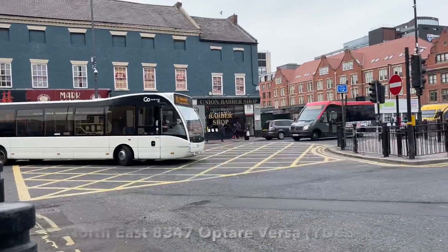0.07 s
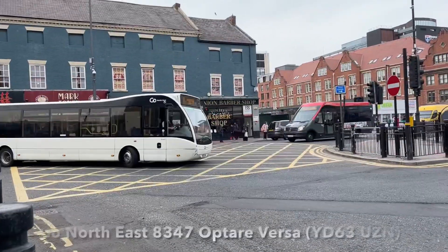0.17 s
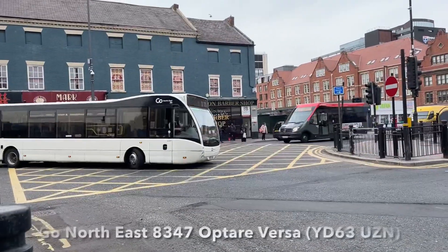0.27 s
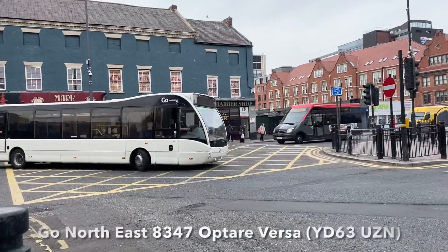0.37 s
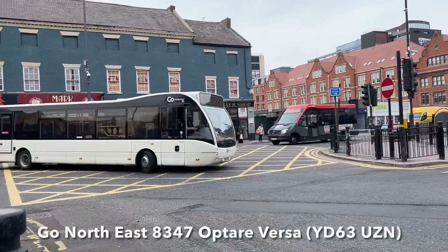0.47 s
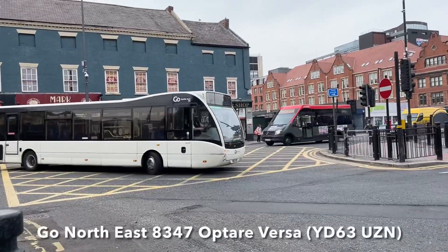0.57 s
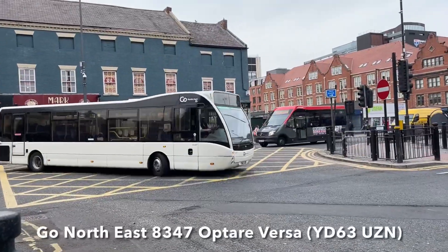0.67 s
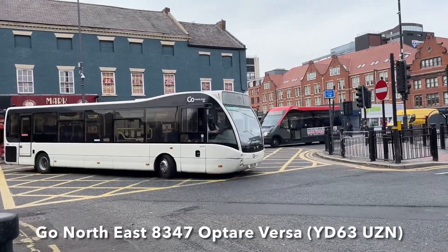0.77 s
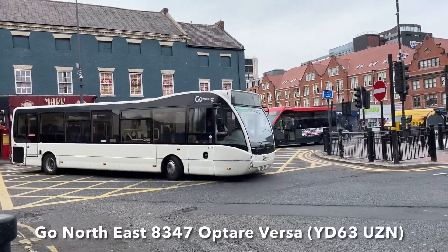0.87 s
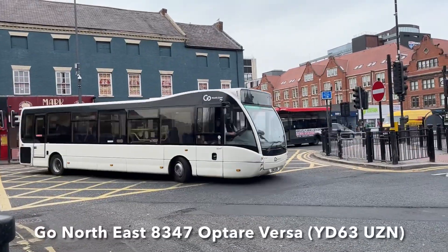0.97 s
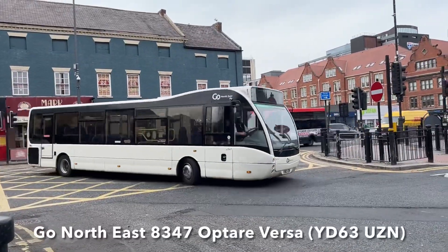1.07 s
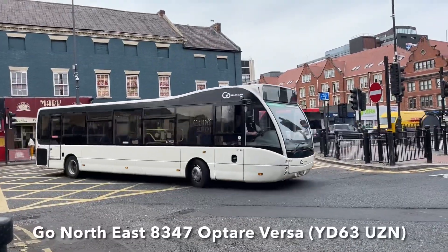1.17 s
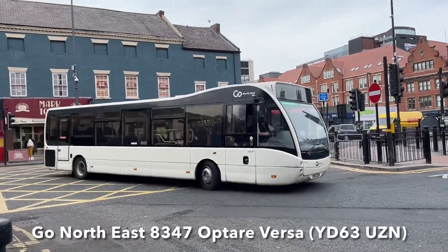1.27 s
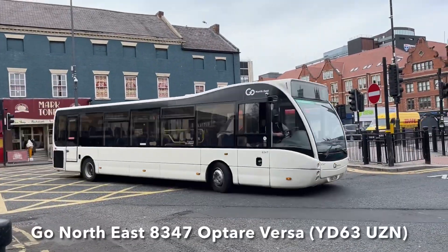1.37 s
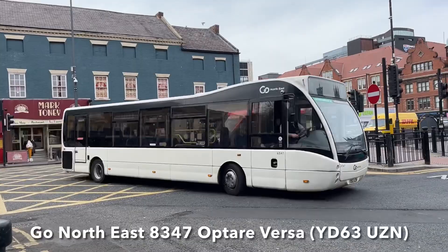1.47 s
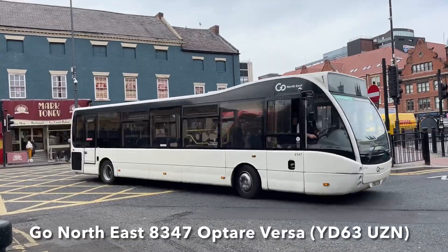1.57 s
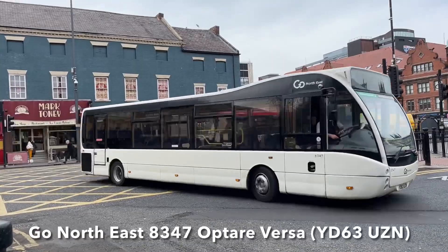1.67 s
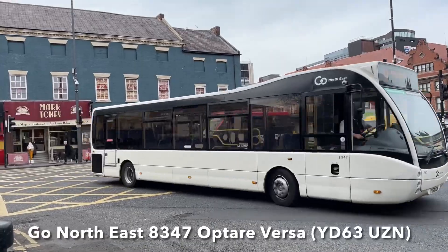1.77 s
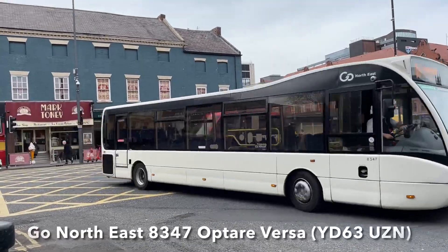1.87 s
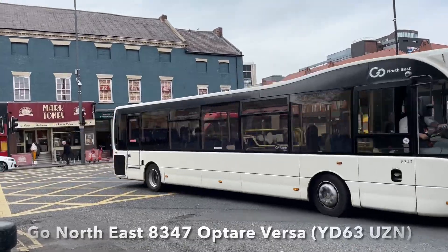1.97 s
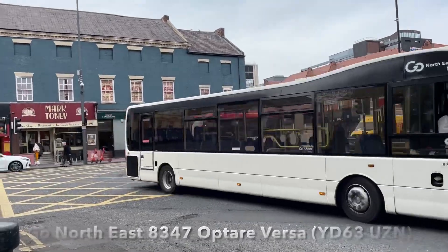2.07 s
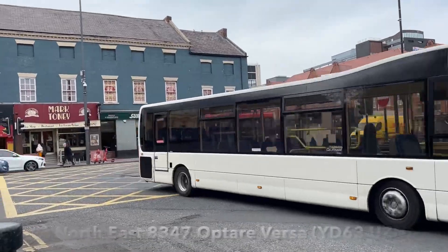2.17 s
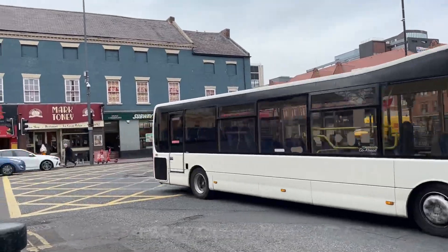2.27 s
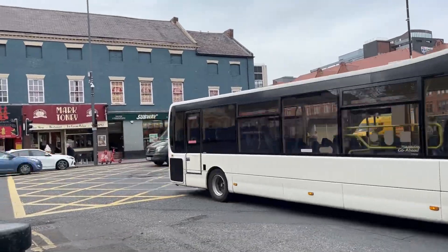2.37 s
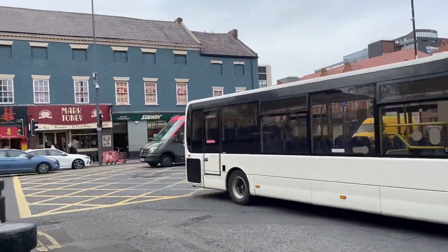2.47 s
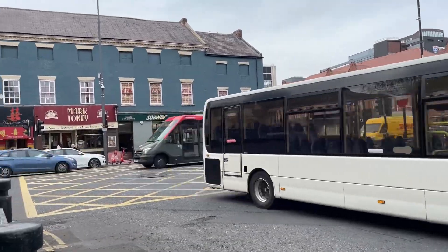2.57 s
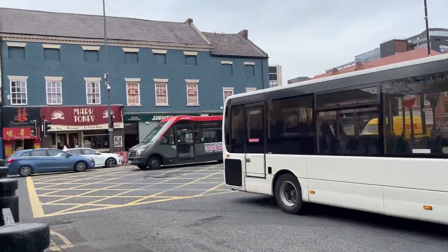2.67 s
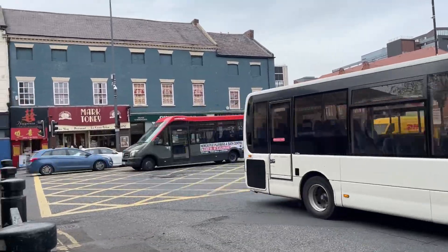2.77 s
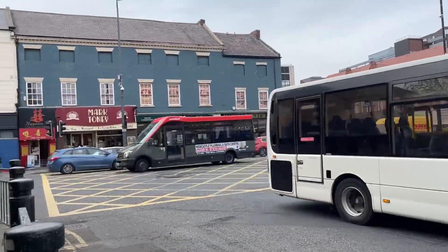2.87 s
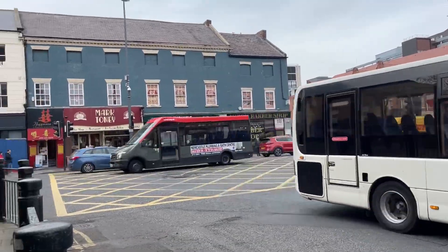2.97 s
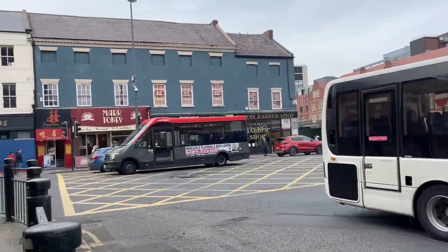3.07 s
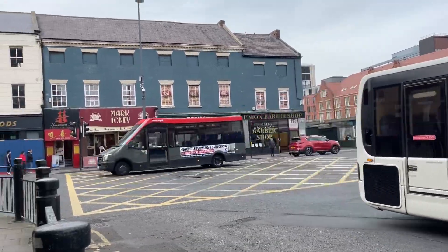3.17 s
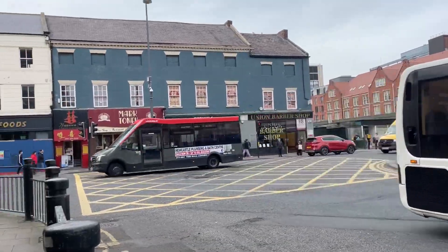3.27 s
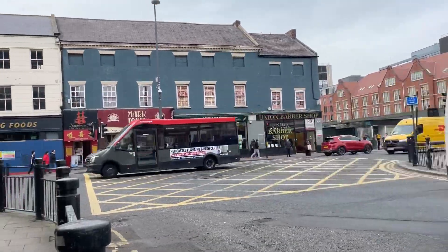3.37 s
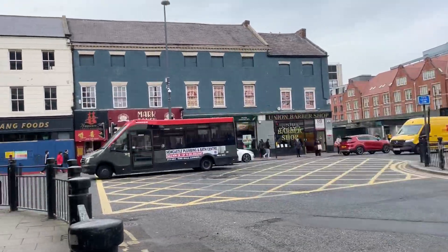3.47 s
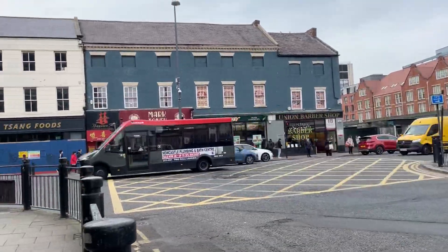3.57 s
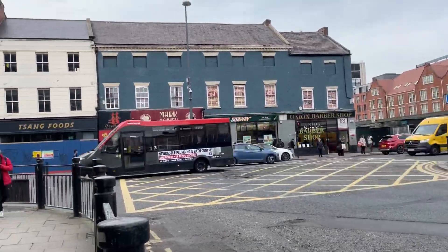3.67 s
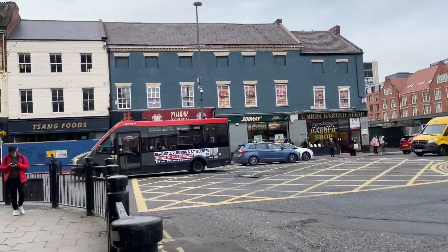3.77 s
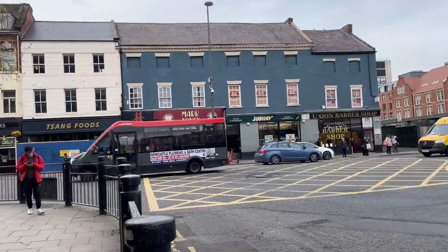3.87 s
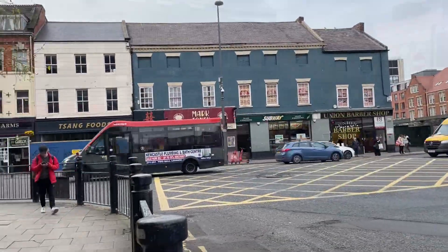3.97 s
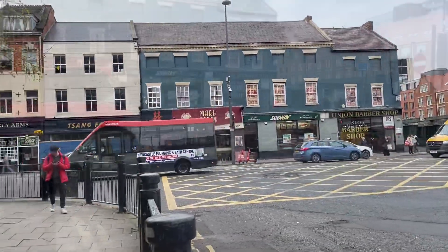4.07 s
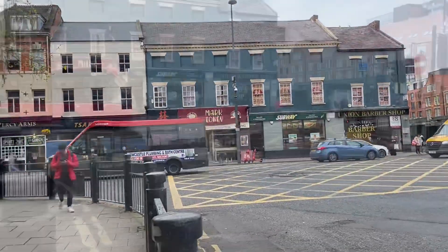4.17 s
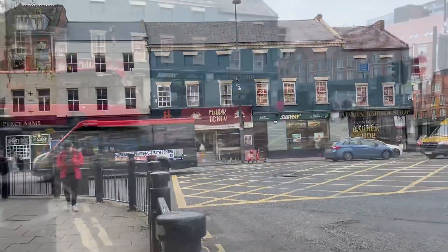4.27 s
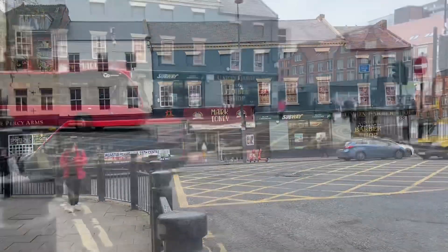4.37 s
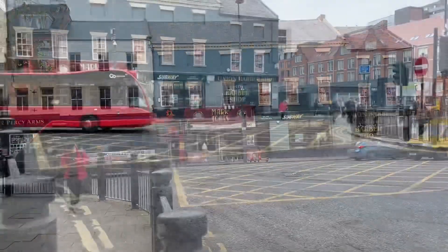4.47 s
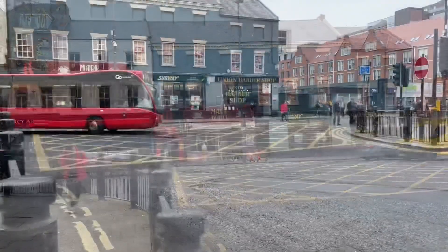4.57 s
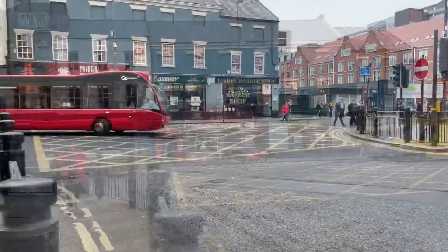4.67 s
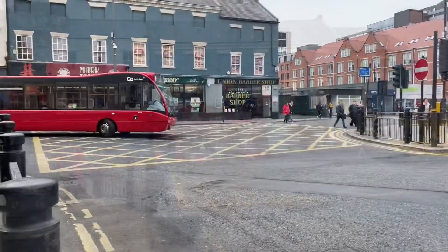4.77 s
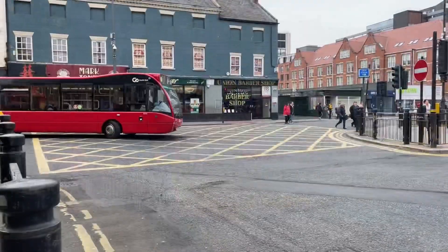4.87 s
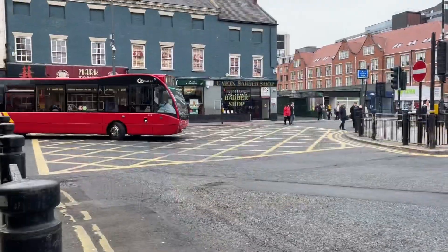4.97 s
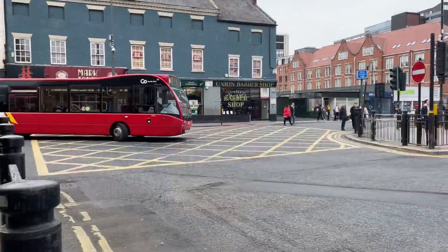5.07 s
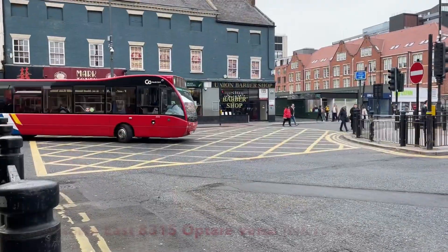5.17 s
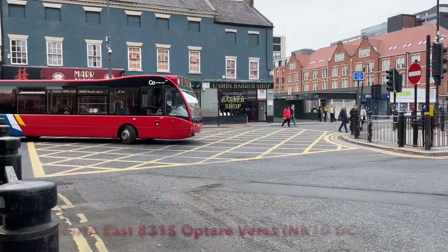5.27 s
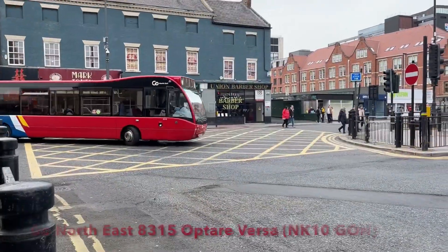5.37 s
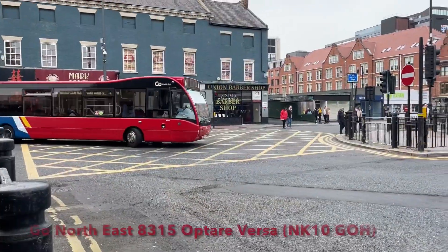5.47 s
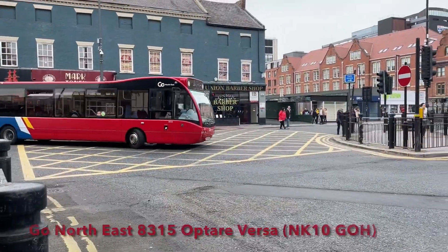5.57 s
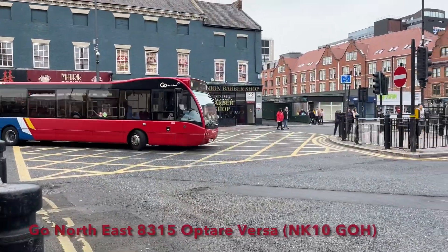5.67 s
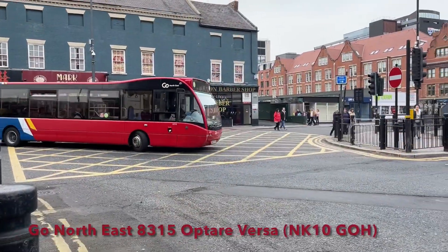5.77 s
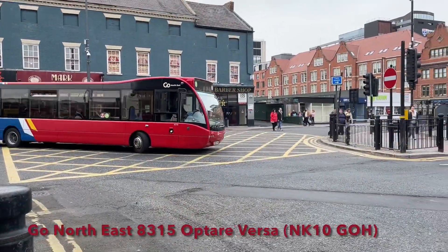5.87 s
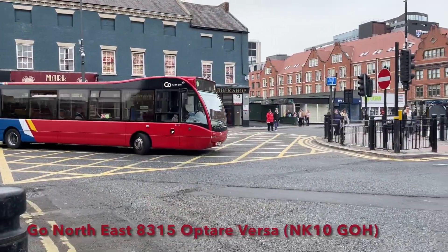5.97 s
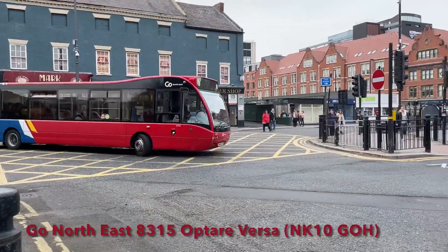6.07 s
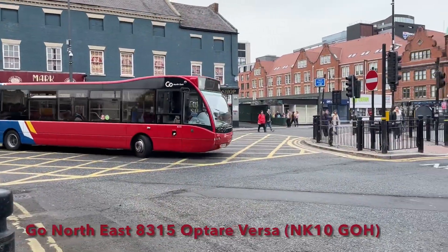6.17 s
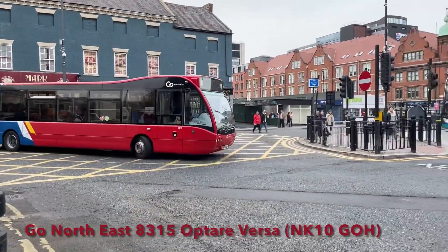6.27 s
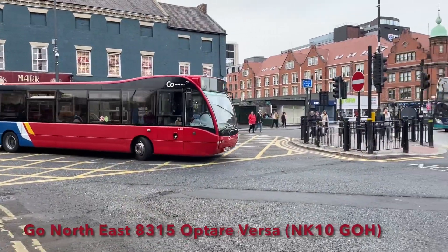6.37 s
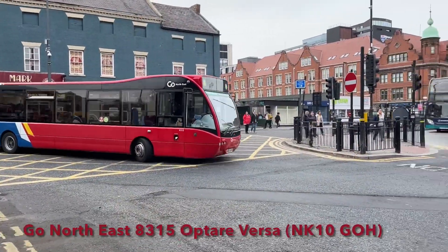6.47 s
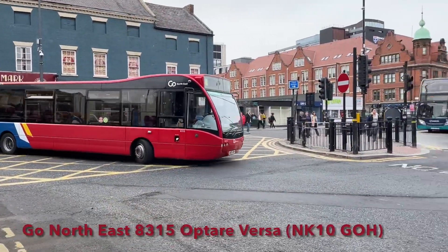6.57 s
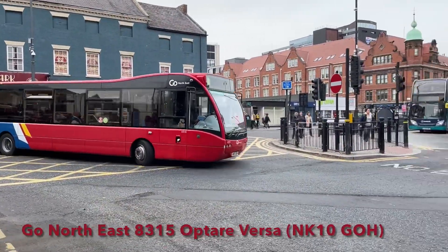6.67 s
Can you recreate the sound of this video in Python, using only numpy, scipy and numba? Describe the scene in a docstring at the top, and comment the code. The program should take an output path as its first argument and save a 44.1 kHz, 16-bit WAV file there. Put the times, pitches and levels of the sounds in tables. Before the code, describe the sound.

Sharp metallic knocks from a loose street cover open over the low rumble of a diesel bus in city traffic. The bus vents a hiss of air, knocks again and passes to the right, the traffic roar swelling and easing. A second bus then pulls in from the left with light puffs, another clank and a rising hum. It is heard in stereo through a phone several metres off, with short echoes from the buildings.

```python
"""Two diesel buses at a city junction

One bus drones past to the right, clattering, and vents its air valve; a second pulls in from the left.
Engines are wavering firing tones over a noise bed of traffic; escaping air is resonant, sinking noise.
Wheels knock a loose iron cover into ringing, and house fronts echo the knocks, air and engines.
All is heard from some metres away through the two microphone ports of a phone."""
import sys
import numpy as np
from scipy import signal
from scipy.fft import rfft, irfft, next_fast_len
from scipy.io import wavfile
from scipy.ndimage import uniform_filter1d, map_coordinates
from numba import njit

SR = 44100
rng = np.random.default_rng(int(sys.argv[2]) if len(sys.argv) > 2 else 0)


def output_pcm(signal):
    """Save a mono or channel-first signal as 16-bit PCM at the path in sys.argv[1].

    Samples are clipped to [-1, 1] before scaling.
    """
    pcm = np.clip(np.atleast_2d(signal).T, -1, 1) * 32767
    wavfile.write(sys.argv[1], SR, np.round(pcm).astype(np.int16))


N = 295470

# ride of the traffic bed, scaled per layer: (time [s], loudness re closest pass [dB], treble lift [dB])
TRAFFIC_RIDE = [(0, -5.5, -3), (.3, -5.5, 0), (.63, -5, 0), (1.07, -6.5, 1.5), (1.4, -4, -1), (2, -4, -1.5),
                (2.3, -4.5, 0), (2.65, -1.5, -2), (2.85, -2, 1.5), (3.3, -1, 0.5), (3.8, -1.5, 1.5),
                (4.05, -3.5, -3), (4.35, -6.5, -3), (4.6, -9.5, -4), (4.85, -9, -6.5), (5.3, -7, -7.5),
                (5.55, -6, -8.5), (5.9, -8.5, -2), (6.2, -7.5, -2), (6.4, -7.5, -4), (6.7, -6, -2)]
# where the nearest vehicle sits:
# (time [s], left port's lag for lows [ms], left port's lag for highs [ms], direct share [0-1])
VEHICLE_BEARING = [(0, -0.16, -0.024, 0.34), (2.2, -0.055, -0.048, 0.26), (2.9, 0.13, -0.00077, 0.25),
                   (3.2, 0.27, 0.37, 0.08), (3.6, 0.43, 0.53, 0.64), (4.7, 0.44, 0.37, 0.16),
                   (4.85, -0.54, -0.27, 0.03), (5.55, -0.42, -0.31, 0.16), (5.7, -0.24, -0.045, 0.31),
                   (6.7, -0.18, 0.035, 0.32)]


def undb(db):
    return 10 ** (np.asarray(db) / 20)


def unit(x):
    return x / np.sqrt(np.mean(x ** 2))


def curves(table, silent=()):
    """A table's columns as automation; the dB columns in silent fade out beyond its ends."""
    times, *columns = np.transpose(table)
    t = np.arange(N) / SR
    outside_db = -400 * (np.maximum(times[0] - t, 0) + np.maximum(t - times[-1], 0))
    return [np.interp(t, times, c) + (k in silent) * outside_db for k, c in enumerate(columns)]


def eq_gain(hz, table):
    """Gain of an EQ curve drawn over log frequency."""
    points_hz, db = np.transpose(table)
    return undb(np.interp(np.log(hz), np.log(points_hz), db))


def glide(start, end, from_hz, to_hz):
    """A pitch moving evenly between two moments."""
    return np.interp(np.arange(N) / SR, (start, end), (from_hz, to_hz))


def gate(start, end, fade_s):
    """An envelope with straight fades in and out."""
    t = np.arange(N) / SR
    return np.clip(np.minimum(t - start, end - t) / fade_s, 0, 1)


@njit
def svf(x, hz, width):
    """State-variable band-pass with a moving centre, gain 1 there."""
    y, band_state, low_state = np.empty(len(x)), 0., 0.
    for i in range(len(x)):
        g, damping = np.pi * hz[i] / SR, width / hz[i]
        g *= 1 + g * g / 3
        v = (band_state + g * (x[i] - low_state)) / (1 + g * (g + damping))
        band_state = 2 * v - band_state
        low_state += 2 * g * v
        y[i] = damping * v
    return y


def resonate(x, hz, width_hz):
    """A signal through one resonance twice, rms 1."""
    hz, width_hz = hz + np.zeros(N), float(width_hz)
    return unit(svf(svf(x, hz, width_hz), hz, width_hz))


def band(hz, width_hz):
    return resonate(rng.standard_normal(N), hz, width_hz)


def walk(rate):
    """Smooth random drift, rate steps a second, spread near 1."""
    hold = int(SR / rate)
    steps = np.repeat(rng.standard_normal(N // hold + 1), hold)
    return 1.3 * uniform_filter1d(uniform_filter1d(steps, hold), hold)[:N]


def tone(hz, db, rough, rate=25):
    """A sine wavering in level and phase."""
    size = np.sqrt(2) * undb(db) * (1 + rough * walk(rate))
    return size * np.sin(2 * np.pi * np.cumsum(hz) / SR + rough * walk(rate))


def ports(x, lag_ms, shadow_db_per_ms=2.5):
    """Pans a source: later and weaker at the further port; a positive lag puts it right."""
    shift, shadow_db = lag_ms * SR / 2000, shadow_db_per_ms * lag_ms / 2
    return np.array([map_coordinates(x, [np.arange(N) - side * shift], order=3, mode="nearest")
                     * undb(-side * shadow_db) for side in (1, -1)])


def street_echo(x, t60_s=0.29, predelay_s=0.015, damp_hz=3700):
    """House fronts return a short, dull cloud of echoes, a different one to each port."""
    t = np.arange(SR) / SR
    cloud = rng.standard_normal((2, SR)) * undb(-60 * t / t60_s) * (t > predelay_s)
    cloud = signal.lfilter(*signal.butter(1, damp_hz, fs=SR), cloud)
    return signal.fftconvolve(x[None], cloud / np.sqrt(np.sum(cloud ** 2) / 2))[:, :N]


def traffic(firings):
    """Flickering noise bed: direct lows and highs from the nearest vehicle, and a wash from all around."""
    # rumble, body drone, tyre roar, fan and intake, hiss, top hiss:
    # (level at closest pass [dB], response to loudness [dB/dB], response to treble lift [dB/dB])
    layers = [(-22, 0.8, 0.07), (-24.5, 0.53, 0.52), (-27, 1.15, 0.18), (-34, 1.17, -0.12),
              (-45, 1.19, 0.26), (-52, 1.33, 1.5)]
    # borders of those layers: (frequency [Hz])
    edges_hz = (0, 120, 450, 1400, 3500, 8000, 20000)
    # traffic colour within each layer: (frequency [Hz], relative level [dB])
    spectrum = [(28, -67), (45, -37), (70, -31.5), (110, -35), (200, -30), (280, -35), (450, -39.5),
                (760, -38.5), (1100, -39), (2200, -46), (3300, -66), (5000, -65), (7500, -67.5),
                (10000, -60.5), (13000, -61), (16000, -72)]
    # stereo width of the wash: (frequency [Hz], side against mid [dB])
    wash_width = [(60, -18), (200, -11), (450, -0.5), (900, 1), (1800, 0.5), (2360, -2), (3100, -8.5),
                  (4100, -9), (5400, 0.5), (7200, 14), (10000, 1)]
    direct, wash = np.zeros((2, N)), np.zeros((2, N))
    direct_share = np.clip(curves(VEHICLE_BEARING)[-1], 0, 1)
    loud_db, treble_db = curves(TRAFFIC_RIDE)
    centres = 28 * 2 ** np.arange(0, 9.3, .4)
    throb = 1 + 0.088 * np.cos(2 * np.pi * firings)  # gas noise swells once a firing
    for (closest_db, by_loud, by_treble), low_hz, high_hz in zip(layers, edges_hz, edges_hz[1:]):
        level_db = closest_db + by_loud * loud_db + by_treble * treble_db + 0.52 * walk(3.805)
        inside = centres[(centres >= low_hz) & (centres < high_hz)]
        colour = eq_gain(inside, spectrum)
        for hz, weight in zip(inside, colour / np.linalg.norm(colour)):
            gain = weight * undb(level_db + 1.33 * walk(14))
            aimed = direct_share / (1 + (hz / 8000) ** 2)  # the treble arrives more scattered
            roar = band(hz, 0.41 * hz) * (throb if hz > 450 else 1)
            direct[int(hz > 1400)] += gain * np.sqrt(aimed) * roar
            spread = eq_gain(hz, wash_width)
            mid, side = band(hz, 0.53 * hz), spread * band(hz, 0.44 * hz)
            wash += gain * np.sqrt(1 - aimed) * np.array([mid + side, mid - side]) / np.hypot(1, spread)
    return *direct, wash


def idler():
    """The firing tone of an engine idling further off."""
    # idle: (time [s], firing rate [Hz], level [dB])
    idle = [(4.3, 55, -22), (4.65, 61.6, -32.5), (5.1, 59.3, -29.5), (5.4, 58.1, -44), (5.95, 60.9, -25),
            (6.3, 62.1, -42), (6.5, 64.7, -28), (6.7, 60.5, -48)]
    return tone(*curves(idle, silent=(1,)), rough=0.44, rate=15)


def distant_engines():
    """Further engines come and go as narrow, gliding hums."""
    # hums: (start [s], end [s], from [Hz], to [Hz], level [dB])
    hums = [(1.47, 2.1, 210, 189, -34), (2.5, 3, 187, 184, -35.5), (3.676, 4.35, 283, 273.7, -34),
            (4.916, 5.7, 100, 110.8, -32), (6.38, 8.4, 224, 340, -31.5), (5.6, 6.36, 160, 270, -40),
            (.75, 1.23, 280, 284, -38)]
    return sum(gate(start, end, fade_s=0.042) * tone(glide(start, end, from_hz, to_hz), db, rough=0.18)
               for start, end, from_hz, to_hz, db in hums)


def body_resonances(swell_db=9):
    """Wheel arches, grilles and exhaust swell and fade as bands of noise in the roar."""
    # swells: (start [s], crest [s], end [s], from [Hz], to [Hz], width [Hz], level [dB])
    swells = [(1.3, 3.5, 4.4, 794, 758, 256, -30), (3.25, 3.6, 3.9, 2490, 1960, 250, -35),
              (3.86, 4.1, 4.4, 2020, 2110, 160, -42.5), (6.2, 6.1, 8.7, 123, 150, 36, -32.5),
              (3.238, 3.53, 4.09, 2900, 3100, 810, -39.5), (3.4, 3.71, 4.0, 5450, 4800, 450, -51.5),
              (5.9, 6.5, 7.0, 1740, 1670, 110, -41.5), (5.9, 6.6, 7.0, 560, 730, 230, -37.5),
              (3.2, 3.55, 4.5, 4000, 3780, 1000, -48)]
    out = np.zeros(N)
    for start, crest, end, from_hz, to_hz, width_hz, db in swells:
        level_db, = curves([(start, db - swell_db), (crest, db), (end, db - swell_db)], silent=(0,))
        out += undb(level_db + 2.4 * walk(20)) * band(glide(start, end, from_hz, to_hz), width_hz)
    return out


def iron_cover(focus_db_per_octave=9, detune=0.015, crack_linger_s=0.0062):
    """Wheels strike and rattle a loose cover; its modes ring out over a hissy crack."""
    # modes of the cover: (pitch [Hz], level [dB], ring time to -60 dB [s])
    modes = [(320, -6, .025), (550, -6, .02), (790, -1, .035), (1080, -3, .03), (1250, -4, .022),
             (1465, -3, .028), (1645, -4, .022), (1755, -2, .032), (2050, -4, .016), (2285, -2, .026),
             (2570, -2, .024), (2900, -6, .016), (3400, -8, .012), (4120, -5, .018), (4570, -7, .014)]
    # wheel hits: (time [s], peak [dB], rattle time constant [s], best excited pitch [Hz], crack rms [dB])
    knocks = [(0.122, -9.5, 0.0023, 1710, -42), (0.127, -12, 0.009, 1730, -39),
              (0.1442, -18.5, 0.0079, 1740, -43), (.336, -24, .005, 2030, -54),
              (0.379, -37, .004, 2200, -57), (1.293, -39, .0067, 2502, -55), (2.845, -19, .003, 900, -60),
              (2.8755, -14, 0.0029, 635, -62), (2.891, -21, 0.0026, 990, -62), (2.915, -21, .004, 700, -64),
              (2.987, -19, .004, 700, -60), (3.0355, -13, .0015, 800, -60), (5.279, -29, 0.015, 2590, -59),
              (5.526, -23.5, .014, 1300, -56), (5.582, -25.5, 0.0091, 893, -46),
              (5.597, -12, 0.0026, 2300, -45), (5.602, -11.5, 0.018, 2190, -44),
              (5.612, -20, 0.017, 850, -40), (5.713, -24, 0.014, 2200, -45)]
    out, t = np.zeros(N + SR), np.arange(SR // 4) / SR
    hz, mode_db, t60 = np.transpose(modes)[:, :, None]
    hiss = band(5460, width_hz=11300)
    for time, peak_db, rattle_s, best_hz, crack_db in knocks:
        span = slice(int(time * SR), int(time * SR) + len(t))
        scatter_db, mistune = rng.standard_normal((2, len(modes), 1))
        falloff_db = np.minimum(focus_db_per_octave * np.abs(np.log2(hz / best_hz)), 18)
        decay = undb(mode_db - falloff_db + scatter_db - 60 * t / t60)
        ring = np.sum(decay * np.sin(2 * np.pi * hz * (1 + detune * mistune) * t), axis=0)
        rattle = rng.standard_normal(len(t)) * np.exp(-t / rattle_s)
        rattle[0] = 4  # sharp first contact
        push = np.hanning(int(.35 * SR / best_hz) + 2)  # a duller blow is a longer, softer push
        hit = signal.fftconvolve(np.convolve(rattle, push), ring)[:len(t)]
        crack = undb(crack_db) * hiss[span] * np.exp(-t / (rattle_s + crack_linger_s))
        out[span] += undb(peak_db) * hit / np.abs(hit).max() + crack
    return out[:N]


def air_valve(sag_start_s=1.443, split_hz=3000):
    """A blast of air, most pitches sinking with the pressure, then small puffs; returns lows and highs."""
    # jet, spit, chuff, pipe resonances, whistles, hiss and nozzle of the blast: (opens [s], attack [s],
    # hold [s], release [dB/s], level [dB], centre [Hz], width [Hz], sag [Hz/s])
    blast = [(1.378, 0.018, 0.047, 40, -32, 2900, 9800, -1),
             (1.379, 0.0098, 0.057, 74, -36, 8000, 3500, -6), (1.388, 0.009, 0.1, 118, -26.5, 270, 300, 0),
             (1.394, 0.0036, 0.048, 202, -23.5, 843, 160, 498),
             (1.395, 0.0034, 0.06, 140, -28, 675, 200, -1), (1.385, 0.04, 0.15, 109, -31, 2700, 280, 900),
             (1.363, 0.04, 0.19, 60, -36.5, 2360, 200, -50), (1.38, 0.014, 0.12, 41, -40, 4000, 560, 400),
             (1.4, 0.11, 0.27, 90, -39.5, 7730, 1260, 10000)]
    # puffs, scuffs and squeaks of air: (start [s], end [s], from [Hz], to [Hz], width [Hz], level [dB])
    puffs = [(2.058, 2.096, 9050, 9050, 7300, -55), (4.499, 4.75, 9550, 9520, 7760, -60.5),
             (4.969, 5.0, 3010, 3470, 2500, -47.5), (4.998, 5.093, 1500, 1500, 1500, -41.5),
             (5.012, 5.055, 2500, 2780, 300, -46), (5.027, 5.093, 4260, 4370, 1100, -48.5),
             (5.32, 5.385, 4700, 3870, 1300, -51), (5.317, 5.39, 1500, 1500, 1500, -43),
             (5.494, 5.55, 6070, 6000, 1980, -62), (5.973, 6.34, 11000, 10900, 8000, -54)]
    out, t = np.zeros((2, N)), np.arange(N) / SR
    for opens, attack, hold, release, db, hz, width_hz, sag in blast:
        onset = np.clip((t - opens) / attack, 0, 1)
        envelope = onset * undb(db - release * np.maximum(t - opens - attack - hold, 0))
        sagging_hz = np.maximum(hz - sag * np.maximum(t - sag_start_s, 0), 0.34 * hz)
        out[int(hz > split_hz)] += envelope * undb(2.4 * walk(25.1)) * band(sagging_hz, width_hz)
    for start, end, from_hz, to_hz, width_hz, db in puffs:
        envelope = undb(db) * gate(start, end, fade_s=0.25 * (end - start))
        out[int(from_hz > split_hz)] += envelope * band(glide(start, end, from_hz, to_hz), width_hz)
    return out * undb(1.1 * walk(40))


def diesel_clatter(ticks_per_s=80, spread_db=12):
    """Uneven ticks ring the engine block, loudest when the bus is nearest."""
    # block resonances: (centre [Hz], width [Hz], level at closest pass [dB])
    block = [(695, 234, -37.5), (1330, 440, -39), (1950, 390, -43)]
    chance, softness, polarity = rng.random((3, N))
    ticks = (chance < ticks_per_s / SR) * undb(-spread_db * softness) * np.sign(polarity - .5)
    ringing = sum(undb(db) * resonate(ticks, hz, width_hz) for hz, width_hz, db in block)
    return ringing * undb(1.3 * curves(TRAFFIC_RIDE)[0])


def second_bus():
    """The driveline sings a rising note as the bus pulls away."""
    # driveline note: (time [s], pitch [Hz], level [dB])
    driveline = [(5.62, 213.7, -37), (5.83, 248, -30.5), (6, 266, -34), (6.38, 273.2, -32.5),
                 (6.45, 278.5, -36.5), (6.58, 278.5, -45), (6.65, 286.3, -27), (6.7, 282, -33)]
    return tone(*curves(driveline, silent=(1,)), rough=0.4)


def first_bus():
    """Cylinder firings drone with two overtones; also returns the running count of firings."""
    # engine: (time [s], firing rate [Hz], fundamental [dB], 2nd harmonic [dB], 4th [dB], roughness [0-1])
    engine = [(0, 78.74, -17.5, -35, -34, 0.34), (.28, 77.64, -20.5, -29, -46.5, 0.08),
              (.56, 80.8, -19, -42, -55, 0.23), (1.04, 84.84, -16.5, -29.5, -34.5, 0.1),
              (1.26, 78.5, -16.5, -33.5, -53, 0), (1.5, 72.14, -19.5, -28.5, -35, 0),
              (1.9, 71.3, -19, -37.5, -34, 0), (2.25, 70.56, -17, -26, -29.5, 0.01),
              (2.57, 69.54, -13.5, -38, -34, 0.02), (2.89, 70.44, -17, -44, -33.5, 0.07),
              (3.05, 66.7, -19, -25.5, -47, 0.1), (3.25, 65.3, -20.5, -35.5, -31.5, 0.07),
              (3.52, 65.4, -17, -34, -27, 0.36), (3.7, 62.27, -25, -42, -29, 0.7),
              (3.85, 60.03, -21, -23.5, -27, 0.4), (4.08, 58.95, -20.5, -40, -32, 0.4),
              (4.15, 58.87, -48, -45, -38, 0.3), (4.45, 58.54, -37, -51, -31, 0.3)]
    hz, db, second_db, fourth_db, rough = curves(engine, silent=(1, 2, 3))
    drone = tone(hz, db, rough) + tone(2 * hz, second_db, rough=0.064)
    drone += tone(4 * hz, fourth_db, rough=0.15, rate=30)
    return drone, np.cumsum(hz) / SR


def scene():
    """Vehicles move across the stereo field; air and cover stay put; the street echo sits behind."""
    drone, firings = first_bus()
    engines = drone + idler() + second_bus() + distant_engines()
    roar_low, roar_high, wash = traffic(firings)
    roar_low += body_resonances()
    air_low, air_high = air_valve()
    knocks = iron_cover()
    echo = street_echo(undb(-8) * (air_low + air_high) + undb(-14.5) * knocks + undb(-32) * engines)
    low_lag_ms, high_lag_ms, _ = curves(VEHICLE_BEARING)
    moving = ports(engines + roar_low + diesel_clatter(), low_lag_ms) + ports(roar_high, high_lag_ms)
    still = ports(air_low, lag_ms=0.385) + ports(air_high, lag_ms=-0.026) + ports(knocks, lag_ms=-0.045)
    return moving + still + wash + echo


def record(dry, mid_top_hz=12630, top_hz=15700):
    """Final EQ: uneven balance, hollows near 8 kHz (centre) and 11 kHz (sides), and a steep high cut."""
    # stereo balance: (frequency [Hz], left minus right [dB])
    balance_curve = [(60, 3), (110, 2), (200, 4), (360, 2), (650, -0.5), (1190, 1), (2160, 1), (3920, -3.5),
                     (7120, 0), (12900, 3)]
    size = next_fast_len(N + SR // 10)
    f = np.arange(size // 2 + 1) * SR / size + 1

    def notch(hz, width_hz, db):
        return undb(db * np.exp(-((f - hz) / (width_hz / 2)) ** 4))

    balance = np.sqrt(eq_gain(f, balance_curve))
    left, right = rfft(dry, size) * np.array([balance, 1 / balance])
    mid = notch(8140, width_hz=1500, db=-31) * (left + right) / 2 / (1 + (f / mid_top_hz) ** 30)
    side = notch(11440, width_hz=2700, db=-40) * (left - right) / 2
    coloured = irfft([mid + side, mid - side], size)[:, :N]
    return signal.sosfilt(signal.ellip(10, .2, 80, top_hz, fs=SR, output="sos"), coloured)


dry = scene()
out = record(dry)
output_pcm(out)
```